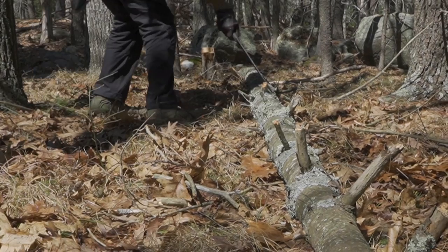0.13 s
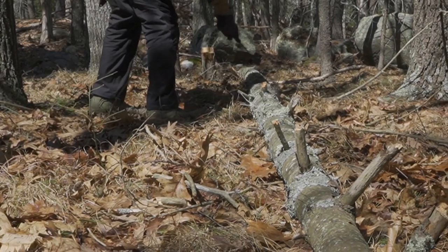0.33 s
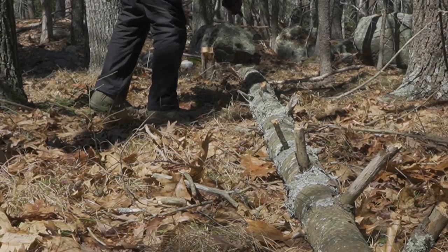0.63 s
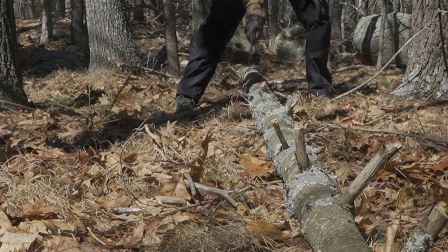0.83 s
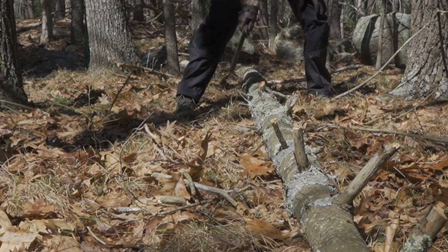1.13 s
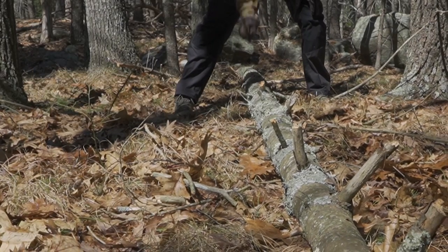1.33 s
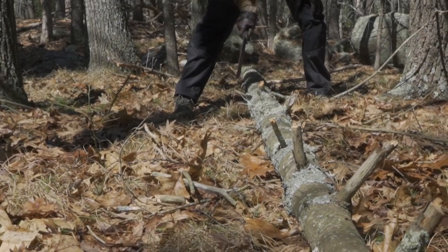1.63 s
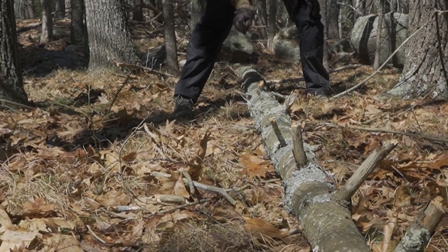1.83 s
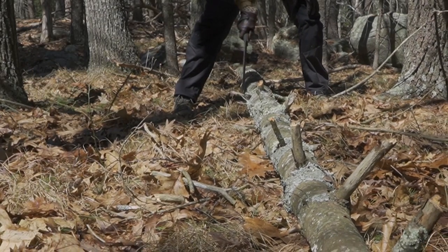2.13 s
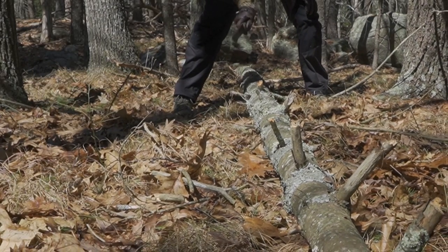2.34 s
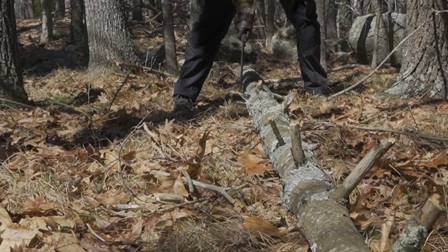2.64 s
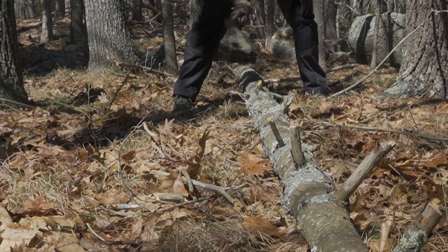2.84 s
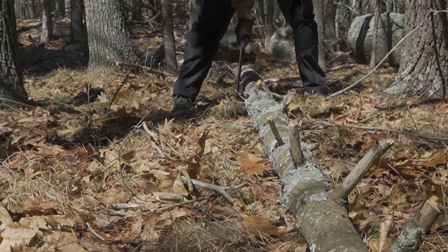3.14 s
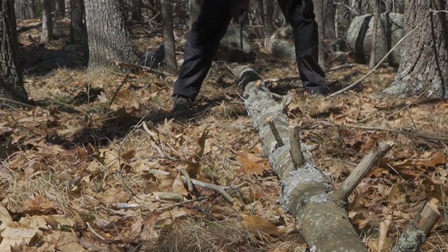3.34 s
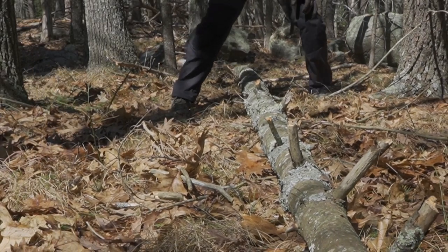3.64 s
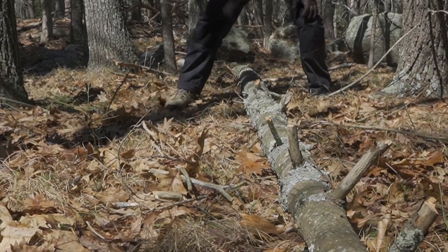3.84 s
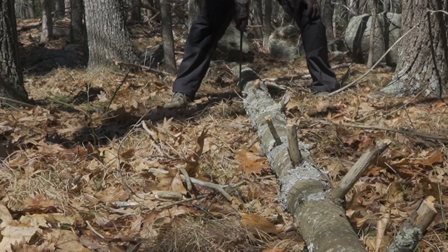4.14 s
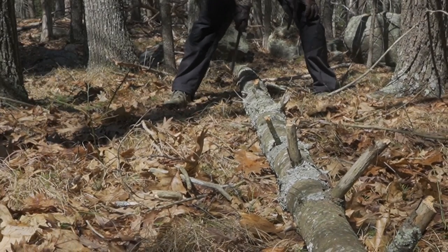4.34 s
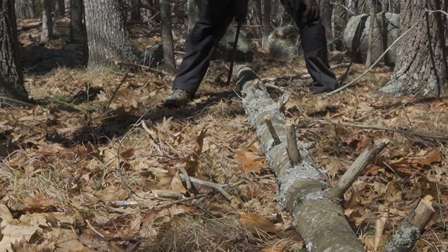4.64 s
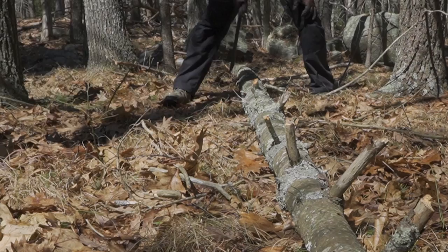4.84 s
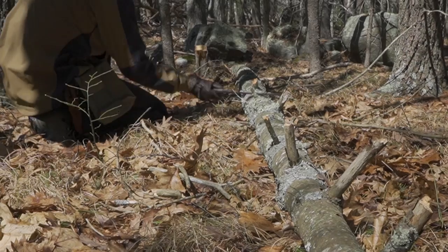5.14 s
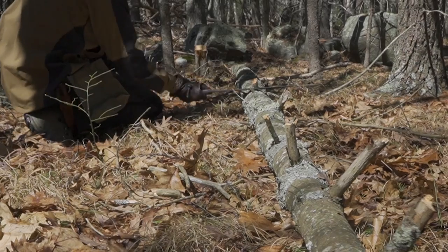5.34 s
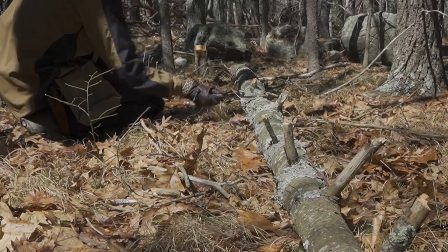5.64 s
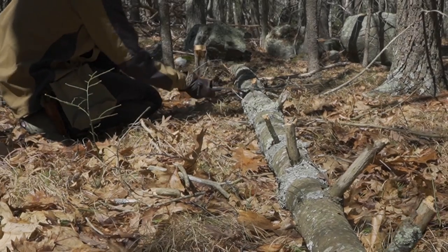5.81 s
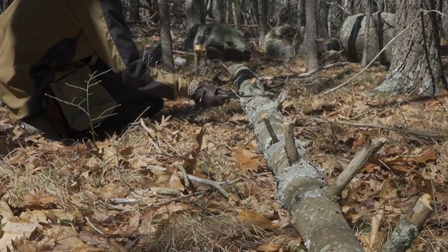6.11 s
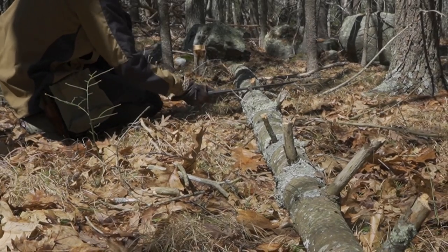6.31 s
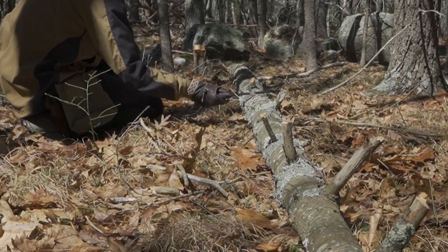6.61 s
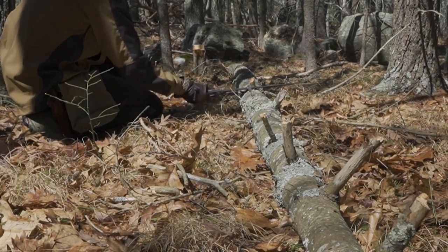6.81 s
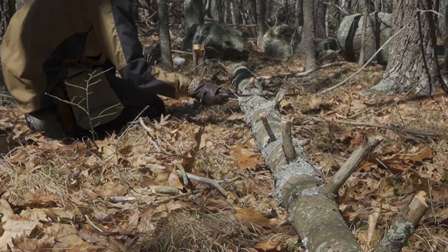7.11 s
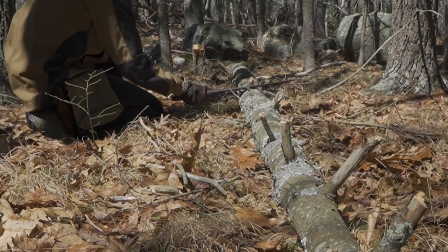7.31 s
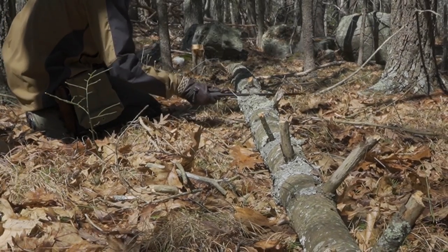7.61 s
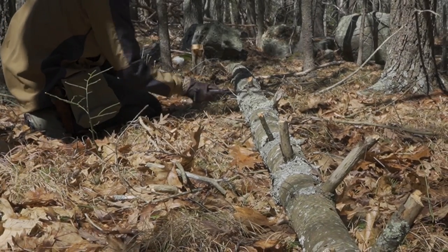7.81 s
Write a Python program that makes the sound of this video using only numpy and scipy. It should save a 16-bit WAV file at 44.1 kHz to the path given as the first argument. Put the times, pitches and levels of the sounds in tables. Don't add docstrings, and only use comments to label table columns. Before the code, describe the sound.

A quiet dry forest with faint low wind and airy hush, heard a few metres from a fallen log. At 0-0.4 s boots rustle and twigs crackle, then a moderate chop lands at 0.4. Harder hollow blows from above follow at 0.95 and 1.47, the latter brightest with a dull thud, then firm ones at 2.03, 2.54 and 3.07, with small metallic ticks as the blade lifts. Each knocks, splits fibres, rings the log low and briefly, and sprinkles chips into leaves. Leaves shuffle at 3.4-3.9; a weaker chop with sharp snaps comes at 4.1, a light tap at 4.5. Around 5 s leaves crunch under a knee. Heavy, tighter side blows hit at 5.25, 5.8, 6.3, 6.8, 7.3 and 7.92, with lighter touches, crackling bark and sleeve swishes between. Trunks return a short dull echo; the loudest hits distort slightly.

```python
import sys
import numpy as np
from scipy import signal
from scipy.fft import rfft, irfft
from scipy.io import wavfile
from scipy.ndimage import uniform_filter1d

SR = 44100
rng = np.random.default_rng(int(sys.argv[2]) if len(sys.argv) > 2 else 0)


def transcribe(u):
    v = np.clip(np.atleast_2d(u).T, -1, 1)
    q = np.round(v * 32767).astype(np.int16)
    wavfile.write(sys.argv[1], SR, q)


def magnitude_from_level(level_db):
    exponent = np.asarray(level_db, float) / 20
    return 10 ** exponent


N = 351036
KNEE_DOWN_S = 5.04

# frequency in Hz, level in dB per Hz.
AIR_COLOUR = [(59, -36.5), (100, -6.5), (271, -0.5), (322, -8.5), (991, -4), (1520, -15), (3400, -18),
              (7770, -32.5), (16000, -44)]
# time in seconds, level in dB.
WIND_BASS = [(0., -65.5), (2.1, -89), (3.3, -64.5), (4.1, -59.5), (4.8, -65.5), (5.1, -61.5), (5.7, -62.5),
             (6.4, -62), (6.75, -65), (7.2, -63), (7.96, -66)]
# frequency in Hz, level in dB per Hz.
LEAF_COLOUR = [(180, -25), (300, -4), (1900, -8.5), (2700, -6.5), (3550, -2.5), (4250, -9.5), (4650, -13),
               (12500, -18), (16000, -22)]
# level in dB, treble in
# dB.
LEAF_TREBLE = [(-68, -14.5), (-51, -5.5), (-53.5, -8.5), (-34, -6)]
# peak in seconds, level in dB, rise and fall in seconds.
RUSTLES = [(.001, -55, .05, 0.24), (.212, -59, 0.0062, 0.016), (.3, -53, 0.01, 0.069),
           (0.377, -38.5, 0.049, 0.021), (.512, -60, 0.017, 0.014), (1.2, -60.5, 0.075, 0.26),
           (1.759, -57, 0.21, .2), (2.016, -67.5, 0.13, 0.036), (2.296, -59, 0.095, 0.21),
           (2.809, -56, 0.1, 0.28), (3.369, -50, 0.07, 0.11), (3.602, -57.5, 0.08, 0.2),
           (3.891, -45.5, 0.14, 0.088), (4.02, -50, 0.037, 0.046), (4.502, -48, 0.014, 0.1),
           (5.14, -49.5, .12, 0.13), (5.2, -59, 0.15, 0.15), (5.572, -56.5, 0.3, 0.17),
           (6.001, -49, 0.07, 0.037), (6.099, -54.5, 0.028, 0.097), (6.276, -38.5, 0.0045, 0.041),
           (6.598, -53.5, 0.18, 0.074), (7.023, -53, 0.057, 0.24), (7.185, -62, .02, .04),
           (7.59, -61, 0.29, 0.12), (7.676, -58, 0.048, 0.23)]
# peak in seconds, peak in dB, fall in ms.
CRUNCHES = [(0.3754, -27, 7.3), (.388, -23, 2.5), (0.791, -53, 3), (.97, -41, 3.3), (3.3717, -35.5, 4.6),
            (4.5025, -24.5, 3.6), (4.5416, -31.5, 1.6), (5.1925, -33.5, 23), (5.225, -32, 1.2),
            (5.2666, -21.5, 2.6), (5.282, -27.5, 5.3), (5.7174, -33.5, 59), (5.7412, -31.5, 6.8),
            (6.0876, -34, 2.3), (6.2061, -31, 4.8), (6.2256, -36, 9.4), (6.2515, -33, 1.8),
            (6.729, -27, 1.7), (6.757, -32.5, 11), (6.8188, -21, 3), (7.1826, -35, 5.7),
            (7.191, -32.5, 1.3), (7.233, -27.5, 4.8), (7.575, -36.5, 2.9), (7.671, -37, 5.3),
            (7.734, -40.5, 7.4), (6.499, -43, 5), (7.8472, -31, 5.4), (7.872, -28.5, 16)]
# peak in seconds, peak in dB, treble in dB, fall in ms.
TWIGS = [(0.152, -37.5, -15, 1.7), (0.2013, -40, 4.5, 13), (.231, -44, 0, 1.5), (0.2766, -40.5, -15, 25),
         (0.351, -29, -3.5, 9), (0.5006, -29, -5.5, 6.6), (.5598, -30.5, -11, 4.9),
         (0.8354, -43, -2.5, 4.7), (1.3505, -29.5, -6, 3.6), (3.106, -23, -4, 4.4),
         (3.534, -40.5, -15.5, 2.2), (4.622, -49, -7.5, 2.5), (3.17, -32, -24, 5.8),
         (3.6856, -41, -7.5, 7.1), (.862, -47, -2, 1.75), (4.099, -15.5, -2, 3.2),
         (4.1218, -10.5, -14.5, 2.1), (4.4323, -36.5, -7, 1.6), (4.4812, -25, -5, 6.5), (4.5121, -26, 4, 3),
         (5.5587, -30.5, -28, 4.8), (5.872, -41, 7.5, 1.5), (6.279, -24, -17, 1.5),
         (6.5667, -23.5, -40, 0.45), (6.6066, -31, -14, 6.8), (7.101, -36, -19, 3.2),
         (7.5247, -40, -6, 6.9), (7.565, -28, -35, .7), (7.6016, -33, -14, 2.6), (7.92, -9, -16, 6.6)]
# start in seconds, level in dB.
TICKS = [
    (1.7964, -39.5),
    (2.3045, -35.5),
    (2.842, -38.5),
]
# frequency in Hz, level in dB, t60 in seconds.
FITTING_PARTIALS = [(1940, -2, 0.014), (3500, 5, 0.0066), (7540, 5, 0.0065), (10000, 7, 0.0037)]
# start in seconds, level in dB, frequency in Hz, length in ms.
SCRAPES = [
    (0.153, -36.5, 2720, 8),
    (0.203, -38.5, 3290, 28),
    (0.513, -43, 2990, 17),
]
# start in seconds, level in dB, frequency in Hz, t60 in seconds.
THUDS = [
    (.345, -39, 237, 0.11),
    (0.371, -41, 300, .1),
    (1.472, -16.5, 302, 0.097),
    (2.034, -28, 170, 0.078),
    (3.075, -30.5, 189, 0.07),
    (4.008, -38, 212, 0.066),
    (4.101, -20, 129, 0.029),
    (4.12, -33, 110, 0.078),
    (4.122, -31.5, 293, 0.051),
    (4.50, -45.5, 294, 0.39),
]
# peak in seconds, peak in dB, fall in ms.
TAPS = [
    (0.37, -39, 35),
    (0.4156, -29, 2.2),
    (4.0068, -31, 4.6),
    (5.6757, -33.5, 1.5),
    (7.281, -31, 11),
]
# peak in seconds, then peak, treble and body in dB, fall in ms.
BITES = [(0.4024, -9, -5.5, -5, 3.7), (0.953, -9, -13, -3, 6.3), (1.4793, -9, -9, -6, 6.9),
         (2.0295, -6, -8.5, -6.5, 4.7), (2.5434, -11.5, -10, -5.5, 7.3), (3.067, -10.5, -9.5, -12, 5.8),
         (4.1041, -10.5, 1.5, -26, 2), (5.2586, -4.5, -32, -6, 2.9), (5.8058, -4, -19, -10, 1.9),
         (6.2963, 0, 0.5, -14, .8), (6.8134, -7, -11.5, -35, 1.4), (7.3014, -6, -11.5, -14, 3.4),
         (7.928, -1.5, -11, -17.5, 1.6)]
# start in seconds, knock in dB, knock in Hz, log ring in dB, ground thump in dB.
BLOWS_ABOVE = [
    (.322, -50, 305, -41, -81),
    (.394, -18, 426, -24, -54),
    (.945, -5, 309, -13.5, -51),
    (1.4709, 0, 585, -16, -48.5),
    (2.0243, -19.5, 883, -26, -48),
    (2.5362, -13, 618, -23.5, -50.5),
    (3.0605, -17.5, 493, -26.5, -56.5),
    (4.099, -22, 533, -32.5, -69.5),
    (4.473, -36, 565, -40.5, -76),
]
# start in seconds, knock in dB, knock in Hz, log ring in dB, ground thump in dB.
BLOWS_SIDE = [
    (5.252, -2.5, 450, -15, -52.5),
    (5.669, -20, 375, -29, -57.5),
    (5.799, 0, 450, -11, -50.5),
    (6.2917, -2, 461, -13, -51.5),
    (6.602, -36, 314, -47, -68),
    (6.807, 0.5, 440, -11.5, -48),
    (7.2938, -3.5, 443, -12.5, -53.5),
    (7.594, -34.5, 330, -44, -64.5),
    (7.9193, -3, 493, -17, -46.5),
]
MODE_HZ = [108, 142, 179, 214, 235, 260, 303, 350, 393, 446, 516, 575, 660, 740, 1060, 1260]
# level in dB and t60 in seconds from above, level in dB and t60 in seconds from the side.
MODE_RINGS = [(-15.5, 0.08, -17.5, 0.15), (-16, 0.15, -26, 0.39), (-12.5, .38, -12, 0.22),
              (-10, 0.3, -6.5, 0.18), (-6.5, 0.35, -2.5, 0.35), (-8.5, 0.23, -28, 0.55),
              (-1, 0.29, -3.5, 0.26), (-10, 0.24, -2, 0.18), (0, 0.11, -28.5, 0.17), (-10, 0.18, -2, 0.085),
              (-6.5, 0.14, -2, 0.084), (-10, 0.13, -19, 0.14), (-3, 0.037, -20.5, 0.12),
              (-19, 0.16, -8.5, 0.037), (-26, .06, -6, 0.023), (-23, .1, -56, 0.033)]


def unit(x):
    return x / np.sqrt(np.mean(x ** 2))


def band(x, lo_hz, hi_hz, order=2):
    return signal.sosfilt(signal.butter(order, [lo_hz, hi_hz], "bandpass", fs=SR, output="sos"), x)


def edge(x, hz, order, kind="lowpass"):
    return signal.sosfilt(signal.butter(order, hz, kind, fs=SR, output="sos"), x)


def colour(x, points):
    hz, db = np.transpose(points)
    f = np.maximum(np.arange(len(x) // 2 + 1) * SR / len(x), 1)
    return irfft(rfft(x) * magnitude_from_level(np.interp(np.log(f), np.log(hz), db)), len(x))


def walk(rate):
    hold = int(SR / rate)
    steps = np.repeat(rng.standard_normal(N // 100), hold)[:N]
    return 1.26 * uniform_filter1d(uniform_filter1d(steps, hold), hold)


def swell(s, db, rise_s, fall_s):
    t = np.arange(N) / SR - s
    return magnitude_from_level(db - 15 * np.maximum(-t / max(rise_s, .005), t / max(fall_s, .005)))


def decay(t, t60):
    return np.exp(-np.log(1000) * t / t60)


def add(track, s, sound):
    i = int(s * SR)
    track[i:i + len(sound)] += sound[:N - i]


def distant_wood():
    hiss, slow, out = colour(rng.standard_normal(N), AIR_COLOUR), walk(1.0), 0
    for hz in 100 * 2. ** np.arange(7):
        out = out + magnitude_from_level(.4 * slow + 1.1 * walk(18)) * band(hiss, hz, 2 * hz)
    return magnitude_from_level(-63) * unit(out + band(hiss, 12800, 20000))


def rumble():
    noise = unit(magnitude_from_level(2.7 * walk(4.4)) * band(rng.standard_normal(N), 28, 118))
    gain = magnitude_from_level(np.interp(np.arange(N) / SR, *np.transpose(WIND_BASS)))
    for s, *_, ground_db in BLOWS_ABOVE + BLOWS_SIDE:
        gain = gain + swell(s + 0.035, ground_db - 5, rise_s=0.2, fall_s=.25)
    return magnitude_from_level(5.5) * gain * noise


def falling_chips(s):
    lag_s, rise_s = 0.009, 0.014
    return swell(s + lag_s, -44, rise_s, 0.063) + swell(s + lag_s, -50, rise_s, 0.15)


def sleeve_swing(s):
    lifted = np.clip((s - 0.032 - np.arange(N) / SR) / 0.0083, 0, 1)
    sweep = swell(s - 0.059, -47, rise_s=0.037, fall_s=0.48) * lifted
    return sweep + swell(s - 0.011, -37.5, 0.01, 0.01)


def stirring():
    litter_db = np.where(np.arange(N) / SR < KNEE_DOWN_S, -66.5, -67)
    gain = magnitude_from_level(litter_db) + sum(swell(*row) for row in RUSTLES)
    for s, *_ in BITES:
        gain = gain + falling_chips(s)
        if s > 5.5:
            gain = gain + sleeve_swing(s)
    return 20 * np.log10(gain)


def leaves():
    db = stirring()
    treble_db = np.interp(db, *np.transpose(LEAF_TREBLE)) - 1.5 * (np.arange(N) > KNEE_DOWN_S * SR)
    flurry_db = 1.2 * walk(55) + 1.92 * walk(160)
    size_db = 3.9 * np.minimum(rng.exponential(size=(2, N)), 6) + [1.2 * walk(300), 1.0 * walk(300)]
    grains = rng.standard_normal((2, N)) * magnitude_from_level(size_db + flurry_db)
    big, small = (colour(g, LEAF_COLOUR) for g in grains)
    low, high = edge(big, 5000, 3), edge(small, 5000, 3, "highpass")
    return magnitude_from_level(db) * (low + magnitude_from_level(treble_db + 8.5) * high) / np.std(band(big, 1400, 6900))


def fracture(rows):
    mid, top, body = np.zeros((3, N))
    before = 512
    ms = (np.arange(3072) - before) * 1000 / SR
    for s, db, treble_db, body_db, rise_ms, fall_ms in rows:
        click_db = 2.75 * np.minimum(rng.exponential(size=len(ms)), 3.5)
        clicks = unit(rng.standard_normal(len(ms)) * magnitude_from_level(click_db))
        clicks[before] = 1.5
        after = np.maximum(ms, 0) / max(fall_ms, .3)
        rising = magnitude_from_level(16 * np.minimum(ms, 0) / max(rise_ms, .2))
        falling = magnitude_from_level(-14 * after) + 0.15 * magnitude_from_level(-2.5 * after)
        shower = magnitude_from_level(db) * clicks * np.where(ms < 0, rising, falling)
        start = s - before / SR
        add(mid, start, shower)
        add(top, start, magnitude_from_level(treble_db) * shower)
        add(body, start, magnitude_from_level(body_db) * shower)
    ring = signal.lfilter(*signal.iirpeak(3560, 4.37, fs=SR), mid)
    presence = edge(magnitude_from_level(1) * band(mid, 2318, 3614) + magnitude_from_level(6) * ring, 4070, 5)
    treble = magnitude_from_level(1) * band(top, 4400, 8900, order=1)
    return presence + magnitude_from_level(-9.5) * band(mid, 1400, 2190) + treble + magnitude_from_level(10.5) * band(body, 680, 1700)


def crunches():
    return fracture([(s, db, -11, -15.5, 10.3, fall_ms) for s, db, fall_ms in CRUNCHES])


def twigs():
    return fracture([(s, db, treble_db, -14, .6, fall_ms) for s, db, treble_db, fall_ms in TWIGS])


def ticks():
    out, t = np.zeros(N), np.arange(1024) / SR
    for s, db in TICKS:
        for hz, partial_db, t60 in FITTING_PARTIALS:
            chance = rng.standard_normal()
            tone = np.sin(2 * np.pi * hz * (1 + .02 * chance) * t)
            add(out, s, magnitude_from_level(db + partial_db + 1.8 * chance) * decay(t, t60) * tone)
    return out


def scrapes():
    out = np.zeros(N)
    for s, db, hz, ms in SCRAPES:
        squeak = unit(band(rng.standard_normal(4096), hz - 140, hz + 140))[-int(ms * SR / 1000):]
        add(out, s, magnitude_from_level(db) * squeak * np.hanning(len(squeak)))
    return out


def thuds():
    out, t = np.zeros(N), np.arange(SR // 4) / SR
    for s, db, hz, t60 in THUDS:
        onset = 1 - np.exp(-t / 0.00065)
        add(out, s, magnitude_from_level(db + 3.0) * onset * decay(t, t60) * np.sin(2 * np.pi * hz * t))
    return out


def tears():
    body_db, rise_ms = -2, 0.87
    rows = [(s, db - 20.5, -9.5, body_db, rise_ms, 13.6) for s, db, *_ in BLOWS_ABOVE + BLOWS_SIDE]
    return fracture(rows + [(s, db, -11, body_db, rise_ms, fall_ms) for s, db, fall_ms in TAPS])


def bites():
    rows = []
    for s, db, treble_db, body_db, fall_ms in BITES:
        rise_ms = (0.38 if s > KNEE_DOWN_S else .45) * fall_ms
        rows.append((s, db, treble_db, body_db, rise_ms, fall_ms))
    return fracture(rows)


def ground_thump(t, side):
    lag_s, length_s = (0.017, 0.046)[side], (0.13, 0.12)[side]
    g = np.clip((t - lag_s) / length_s, 0, 1)
    return np.sin(np.pi * g ** 0.64) * np.sin(2 * np.pi * 51.7 * t * (1 + 1.0 * t) + rng.standard_normal())


def log_ring(t, side):
    hz, rings = np.array(MODE_HZ)[:, None], np.array(MODE_RINGS)
    mode_db, t60 = rings[:, 2 * side, None], rings[:, 2 * side + 1, None]
    share = magnitude_from_level(mode_db + 1.3 * rng.standard_normal((len(hz), 1)))
    return_s = (0.0018, 0.00895)[side]
    late = np.maximum(t - return_s - 1.1 / hz, 0)
    modes = share * decay(late, t60) * (1 - np.exp(-late / 0.0021)) * np.sin(2 * np.pi * hz * late)
    soil_db = 5.5 * (np.exp(-late / .035) - .5)
    chance = rng.standard_normal((len(hz), 40))
    rocking_db = 1.1 * np.array([np.interp(t, np.arange(40) * .018, row) for row in chance])
    return band((modes * magnitude_from_level(soil_db + rocking_db)).sum(0), 88, 6000)


def knock(t, hz, side):
    cycles, glide, edge_db = (2.9, 3.2)[side], (0.61, 0.32)[side], (-8, -16)[side]
    u = np.minimum(t * hz / cycles, 1)
    turns = cycles * ((1.021 + glide) * u - glide * u ** 2)
    bite = magnitude_from_level(edge_db) * np.sin(2 * np.pi * 1200 * t)
    return band(np.sin(np.pi * u ** 1.32) * (np.sin(2 * np.pi * turns) + bite), 310, 6000)


def blows(table, side):
    out, t = np.zeros(N), np.arange(SR // 2) / SR
    for s, knock_db, knock_hz, ring_db, ground_db in table:
        add(out, s, magnitude_from_level(knock_db) * knock(t, knock_hz, side))
        add(out, s, magnitude_from_level(ring_db) * log_ring(t, side))
        add(out, s, magnitude_from_level(ground_db + 11.0) * ground_thump(t, side))
    return out


def trunks(x):
    t = np.arange(SR // 2) / SR
    tail = band(rng.standard_normal(len(t)), 430, 7500, order=1) * decay(t, 0.73) * (t > .012)
    return magnitude_from_level(-28) * signal.fftconvolve(x, tail / np.sqrt(np.sum(tail ** 2)))[:N]


def scene():
    background = distant_wood() + rumble() + leaves()
    cracks = crunches() + twigs() + tears() + bites()
    chopping = blows(BLOWS_ABOVE, 0) + blows(BLOWS_SIDE, 1) + cracks + ticks()
    return (background + scrapes() + thuds() + chopping + trunks(chopping))[None]


def roll_off(x):
    return signal.sosfilt(signal.butter(12, 16670, fs=SR, output="sos"), x)


def record(dry):
    x = signal.sosfilt(signal.ellip(8, .2, 60, 15800, fs=SR, output="sos"), dry)
    return roll_off(np.clip(x, -1, 1))


dry = scene()
out = record(dry)
transcribe(out)
```